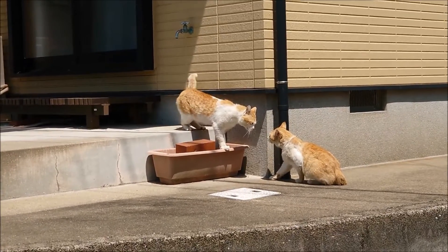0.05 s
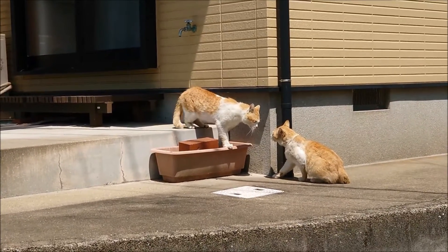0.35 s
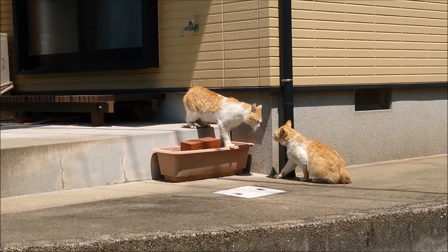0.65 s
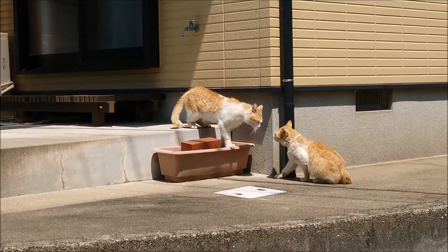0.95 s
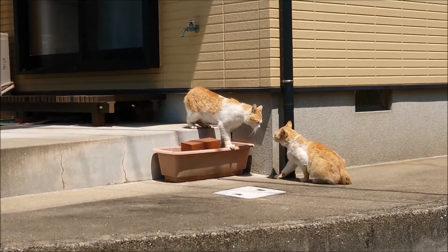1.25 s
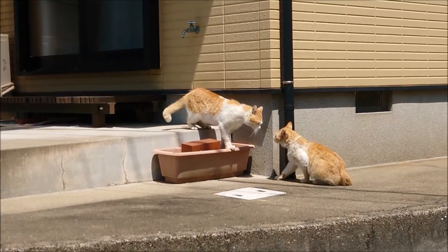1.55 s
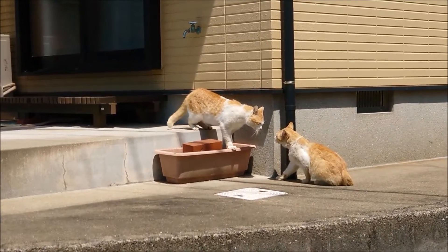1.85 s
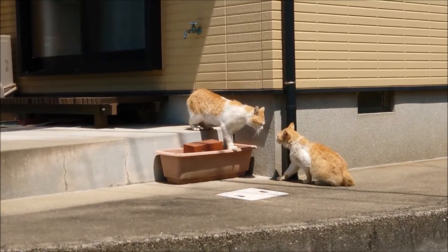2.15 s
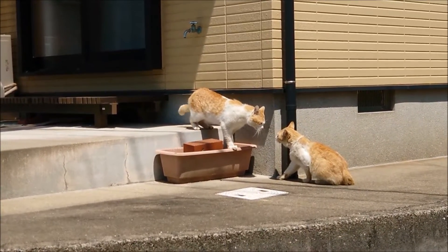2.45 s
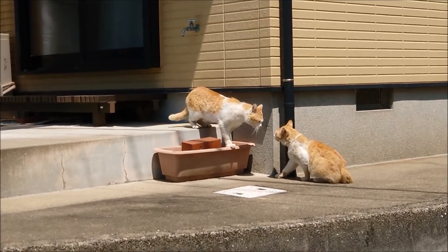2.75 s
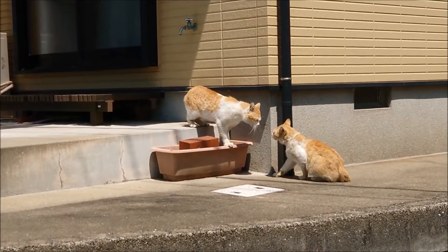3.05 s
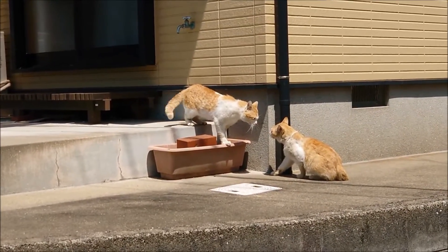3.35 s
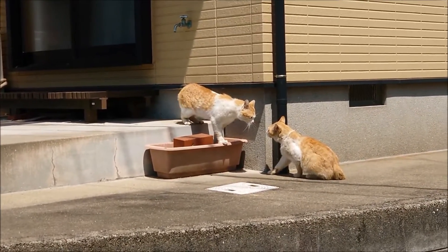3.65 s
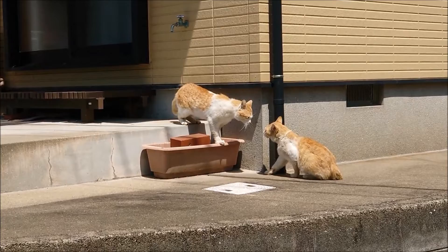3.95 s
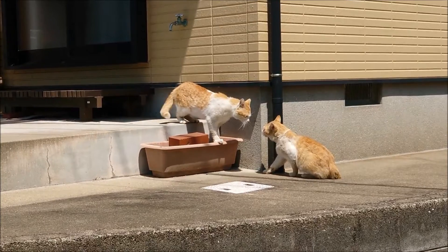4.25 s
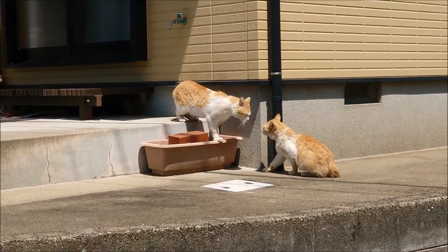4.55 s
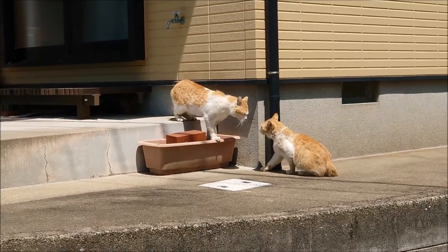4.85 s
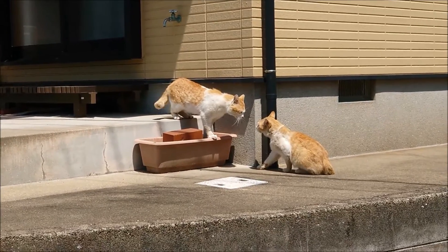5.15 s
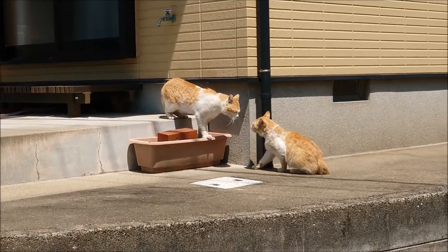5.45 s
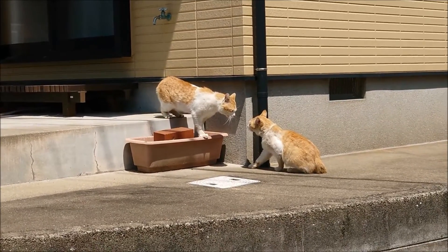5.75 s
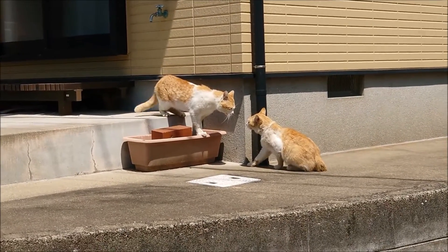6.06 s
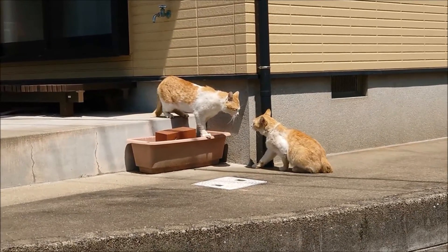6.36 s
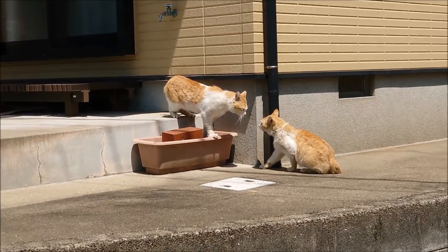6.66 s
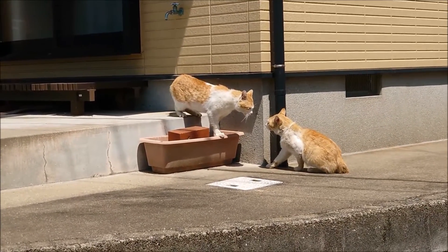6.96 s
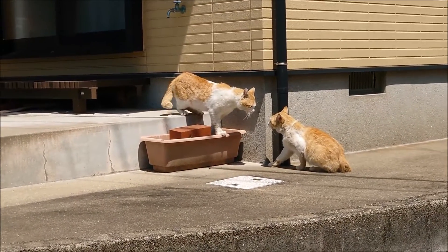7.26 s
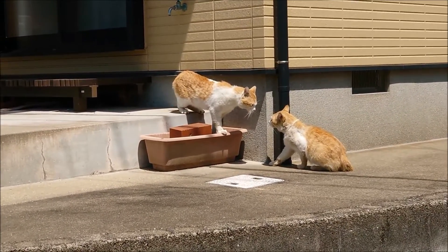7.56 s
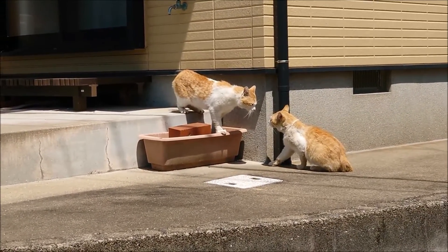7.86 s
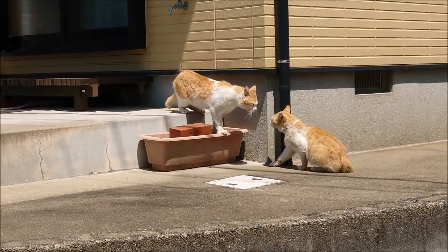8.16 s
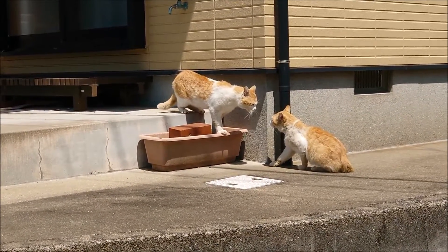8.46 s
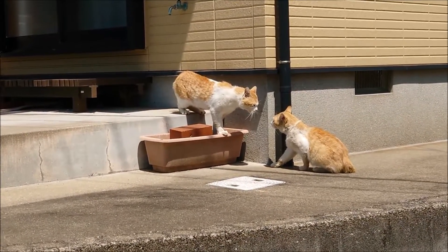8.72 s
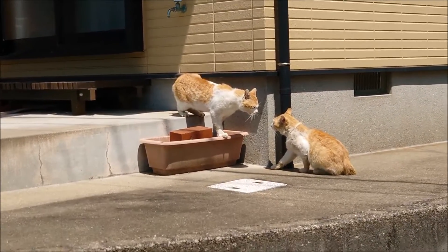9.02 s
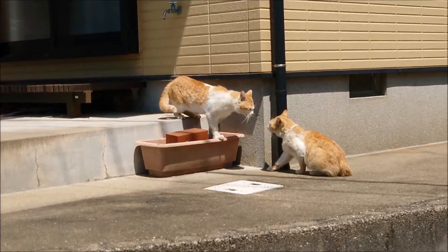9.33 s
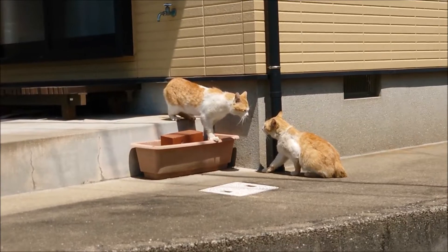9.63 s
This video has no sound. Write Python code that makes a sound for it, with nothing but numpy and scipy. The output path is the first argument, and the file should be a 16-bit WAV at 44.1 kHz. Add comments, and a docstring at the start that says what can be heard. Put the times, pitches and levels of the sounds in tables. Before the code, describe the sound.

Two cats threaten each other beside a house, a few metres from a stereo microphone. The louder is already mid-yowl, a clean, moaning tone that dulls and falls away by 1.3 seconds. It yowls again from about 2 to 4 seconds, brightening as its mouth opens, then sliding down. The rival answers from 4 to 6 seconds with a quieter, closed-mouth moan, overlapped by the third yowl from 4.8 to 6.6. A very faint low moan lingers in the pause, and the rival gives a short falling reply around 8 seconds. The fourth yowl runs from 8.3 to nearly 10 seconds, slightly raspier and climbing before it dips. Small birds chip nearby throughout, with a few tiny dry ticks between 3 and 7.5 seconds. Light wind rumbles on the microphone over faint town noise, and a distant motor hum swells slightly from about 6 seconds.

```python
"""A cat in mid-yowl, a few metres from the microphone on a concrete drive beside a house wall.
It yowls four times, and a rival answers with its mouth nearly shut. Each yowl is a clean harmonic
tone from the vocal folds, a moan that brightens as the jaw opens and dulls as it closes.
Small birds chip nearby and a few dry ticks sound. Far off a motor hums in the town noise,
and light wind rumbles on the two ports of the stereo microphone."""
import sys
import numpy as np
from scipy import signal
from scipy.fft import rfft, irfft
from scipy.io import wavfile
from scipy.ndimage import uniform_filter1d

SR = 44100
rng = np.random.default_rng(int(sys.argv[2]) if len(sys.argv) > 2 else 0)


def inscribe(sig):
    """Save sig as 16-bit PCM at rate SR to the path in sys.argv[1].

    A 1-D sig is mono; a 2-D sig holds one channel per row.
    Samples are clipped to [-1, 1] before scaling.
    """
    pcm = np.round(np.clip(np.atleast_2d(sig).T, -1, 1) * 32767)
    wavfile.write(sys.argv[1], SR, pcm.astype(np.int16))


N = 431738
TIME = np.arange(N) / SR
FREQS = np.fft.rfftfreq(N, 1 / SR)

# the louder cat's four yowls: time_s, pitch_hz, level_db, mouth (0 shut, 1 open)
FIRST_YOWL = [(0.0, 513, -40.2, 0.72), (0.28, 513, -43, 0.55), (0.55, 492, -42.5, 0.32),
              (0.686, 467, -37, 0.17), (1.023, 407.3, -41.5, 0.14), (1.27, 330, -48, 0.27)]
SECOND_YOWL = [(2.1, 452.3, -46.5, 0.32), (2.484, 462.6, -41, 0.41), (2.668, 485.7, -38.5, 0.7),
               (3.109, 496, -40, 0.78), (3.302, 497, -43, 0.61), (3.58, 479, -41.5, 0.3),
               (3.689, 464.6, -39.0, 0.2), (3.858, 409.3, -40.5, 0.0), (4.2, 304, -43, 0.0)]
THIRD_YOWL = [(4.81, 468.7, -52.5, 0.39), (4.948, 473.5, -39.5, 0.51), (5.186, 450, -38.5, 0.67),
              (5.511, 469.5, -39, 0.73), (5.716, 474.6, -38, 0.97), (6.0, 488.7, -39.5, 0.91),
              (6.188, 485, -42.5, 0.66), (6.406, 457.6, -42.5, 0.41), (6.565, 377.5, -48.5, 0.29),
              (6.8, 274, -37, 0.58)]
FOURTH_YOWL = [(8.285, 454.5, -49, 0.31), (8.415, 453.9, -39.5, 0.74), (8.546, 469.2, -40, 0.72),
               (8.68, 457.5, -36, 0.77), (8.913, 476.6, -39, 0.91), (9.146, 500.4, -42, 0.93),
               (9.342, 515.6, -43.5, 0.73), (9.59, 514.2, -43.5, 0.31), (9.683, 486.5, -43.5, 0.27),
               (9.79, 451.3, -37.5, 0.1)]
# what the open mouth does to the partials and to two resonances:
# mouth (0-1), fundamental_db, octave_db, overtones_db, middle_hz, middle_db, high_hz, high_db
MOUTH_VOWELS = [(0, -1.5, -41, -50.5, 4440, 17, 5500, 0), (.35, 0, -3.5, -22, 4250, 6.5, 5660, 5),
                (.6, -2.5, -1.5, -19.5, 3667, 17, 5509, 9), (1, -8.5, 9.5, -12, 3387, 15.5, 6040, 10.5)]
# overtone colour of the throat: frequency_hz, gain_db
THROAT_COLOUR = [(1400, 0), (1900, -7), (2450, -4), (2900, -30.5), (3400, -23.5), (4300, -17.5),
                 (5000, -22.5), (5900, -22), (6800, -30.5), (8200, -58.5), (9300, -32), (10300, -54.5),
                 (12300, -29.5), (15000, -48)]
# catches and surges in the voice, strongest on its octave: peak_s, change_db, rise_fall_s
VOICE_CATCHES = [(3.33, -1, .04), (3.48, 3.5, 0.02), (4.92, 9, .02), (5.0, -1.5, 0.027), (5.5, -3.5, 0.13),
                 (6.41, 1, 0.032), (8.471, -4.5, 0.011), (8.69, -11, 0.039), (8.799, -2.5, 0.013),
                 (9.009, -4.5, 0.049)]
# the rival's two answers: time_s, pitch_hz, fundamental_db, octave_db
LONG_ANSWER = [(4.04, 354, -55, -71), (4.17, 443, -45.5, -63.5), (4.26, 453.7, -44.5, -60.5),
               (4.55, 416.6, -45.5, -48), (4.82, 424, -46.5, -50.5), (5.0, 401, -54, -52),
               (5.58, 365.5, -54.5, -70.5), (5.78, 372.4, -58, -64.5), (6.25, 307.5, -73, -84.5)]
SHORT_ANSWER = [(7.85, 595, -73, -86), (8.1, 460, -55.5, -83), (8.3, 398, -65, -75)]
# a faint low moan in the pause: time_s, pitch_hz, level_db
LOW_MOAN = [(6.6, 318, -62), (6.8, 272, -67.5), (6.92, 298, -74), (7.2, 311, -74), (7.7, 302, -74),
            (8.15, 274, -78)]
# how the voices reach the microphone's ports: frequency_hz, left_minus_right_db, left_lead_rad
MIC_PORTS = [(450, -2.5, 0.17), (960, -7.5, -0.96), (1510, -8.5, 1.4), (2120, 2, -1.8), (2270, -2, -0.71),
             (3500, 0, 0.91), (5800, -41, -0.066), (9000, -17.5, 1), (13000, -1.5, 0.7)]
# nearby birds: peak_s, level_db, rise_fall_s
BIRD_CHIPS = [(0.147, -45.5, .0098), (0.602, -63.5, .014), (1.008, -47.5, 0.01), (1.772, -57, 0.015),
              (1.977, -63, .022), (2.768, -51.5, 0.014), (3.457, -48.5, 0.011), (3.818, -59, 0.013),
              (4.179, -54, 0.011), (4.539, -58.5, 0.034), (4.974, -48.5, 0.017), (5.768, -52, .012),
              (6.661, -46, 0.009), (7.161, -52.5, 0.027), (7.511, -49, 0.015), (7.969, -63, 0.021),
              (8.432, -46, 0.012), (9.42, -46, .017)]
# small dry ticks: start_s, level_db, decay_s, centre_hz, half_width_hz
DRY_TICKS = [(3.308, -54, .005, 1990, 247), (3.601, -60, .001, 13000, 5000),
             (6.306, -58, 0.00093, 13000, 6000), (7.294, -61, 0.0011, 13000, 8000)]
# gusts on the microphone: peak_s, level_db, rise_fall_s, left_minus_right_db
MIC_GUSTS = [(1.4, -47.5, 0.3, -2), (2.7, -48, .2, -12.5), (3.051, -42.5, 0.16, 0), (4.35, -48.5, .05, -21),
             (5.45, -41, .1, -14), (6.25, -45.5, 0.3, 11), (7.45, -45.5, 0.23, -8.5), (7.85, -50, 0.2, -28),
             (8.55, -48.5, 0.52, 2)]
# colour of the wind rumble: frequency_hz, gain_db
WIND_COLOUR = [(15, -3), (30, 4), (50, -7), (80, -7.5), (120, -23.5), (200, -28), (400, -70.5)]
# swells of the far motor's hum: peak_s, level_db, rise_fall_s
MOTOR_SWELLS = [(6.42, -48, 0.15), (7.2, -51, 0.24), (8.6, -47, 0.44)]
# colour of the far town noise: frequency_hz, gain_db
TOWN_COLOUR = [(100, -4), (160, -17), (240, -24), (400, -16), (680, -15.5), (1000, -19), (1600, -25.5),
               (2200, -32), (3000, -37.5), (4200, -35.5), (6300, -39.5), (8200, -59), (12500, -48),
               (15500, -50)]
# its stereo width: frequency_hz, side_minus_mid_db
TOWN_WIDTH = [(100, -23.5), (300, -9), (700, -1.5), (1500, 1), (4000, -1), (12000, 1)]

STRAIN_HZ, STRAIN_DB_PER_HZ = 495.7, 0.1352  # above this pitch power moves from fundamental to octave
GIVE_OUT_HZ, GIVE_OUT_DB_PER_HZ = 369.4, 0.79  # below this pitch the voice dies away
SAG_DULLS_DB_PER_HZ = 0.06  # overtones lost while the pitch scoops up or sags from its peak
UNDERTONE_RATIO, UNDERTONE_DB = .6, -35  # a faint second tone under each yowl


def yowl(table, low_hz, low_db, bright_db, treble_db, ring_db, tongue, scoop_hz=0, scoop_s=1,
         flutter_db=3, patchy_db=3, tremble_db=2, rasp=0.17, treble_follow=0.57, open_db=-56):
    """The folds sound a gliding tone; the opening mouth lifts its overtones and slides resonances."""
    out, on = np.zeros((2, N)), span(table)
    t = TIME[on]
    hz, level_db, mouth = curves(table, t)
    flat_hz = scoop_hz * np.exp((t[0] - t) / scoop_s)
    hz -= flat_hz
    level_db -= GIVE_OUT_DB_PER_HZ * np.maximum(GIVE_OUT_HZ - hz, 0)
    strain_db = STRAIN_DB_PER_HZ * np.maximum(hz - STRAIN_HZ, 0)
    catch_db = sum(db * swell(t - s, seconds) for s, db, seconds in VOICE_CATCHES)
    base_db, octave_db, over_db, *_ = curves(MOUTH_VOWELS, mouth)
    # the tongue shifts the vowel from call to call
    *_, middle_hz, middle_db, high_hz, high_db = curves(MOUTH_VOWELS, mouth + tongue)
    resonances = [(low_db, low_hz), (middle_db + ring_db, middle_hz), (high_db + ring_db, high_hz),
                  (-17 * (1 - mouth), 2450)]  # a closing mouth swallows one band
    phase = unsteady_phase(hz, waver=.0024, jitter=0.0036)
    voice = partial(phase, hz, level_db + base_db - strain_db + .65 * drift(40, len(t)))
    octave_db += level_db + strain_db + catch_db + 1.2 * drift(35, len(t))
    voice += partial(2 * phase, 2 * hz, octave_db)
    under_db = level_db + UNDERTONE_DB + 3 * drift(8, len(t))
    voice += partial(UNDERTONE_RATIO * phase, UNDERTONE_RATIO * hz, under_db)
    sag_db = SAG_DULLS_DB_PER_HZ * (np.maximum.accumulate(hz) - hz + flat_hz)
    over_db += level_db - sag_db + 0.41 * catch_db
    # the folds close unevenly, so all overtones tremble together
    over_db += tremble_db * np.tanh(drift(70, len(t)))
    # the treble also leaves through the nose, so it fades less as the mouth shuts
    nasal_db = open_db + treble_db + treble_follow * (over_db - open_db)
    for k in range(3, 28):
        drive_db = over_db + bright_db if k < 6 else nasal_db + patchy_db * drift(6, len(t))
        vowel_db = sum(db * resonance(k * hz, centre, half_width_hz=220) for db, centre in resonances)
        db = drive_db + colour(THROAT_COLOUR, k * hz) + vowel_db
        db += flutter_db * np.tanh(drift(22, len(t)))
        grit = 1 + rasp * np.log(k / 2) * drift(500, len(t))  # higher overtones vary more per cycle
        voice += grit * partial(k * phase, k * hz, db)
    out[:, on] = voice * fade(t, seconds=.024)
    return out


def answer(table, nasal_db=-35, nasal_hz=4200):
    """The rival yowls through a closed mouth: two strong partials and a thin nasal ring."""
    out, on = np.zeros((2, N)), span(table)
    t = TIME[on]
    hz, base_db, octave_db = curves(table, t)
    phase = unsteady_phase(hz, waver=.003, jitter=0.0011)
    voice = partial(phase, hz, base_db + .4 * drift(21, len(t)))
    voice += partial(2 * phase, 2 * hz, octave_db)
    for k in range(3, 12):
        nose = resonance(k * hz, nasal_hz, half_width_hz=220)
        voice += nose * partial(k * phase, k * hz, base_db + nasal_db)
    out[:, on] = voice * fade(t, seconds=0.033)
    return out


def moan():
    """A faint, nearly pure low moan between the yowls."""
    hz, db = curves(LOW_MOAN, TIME)
    phase = unsteady_phase(hz, waver=0.00496, jitter=0.0016)
    return partial(phase, hz, db) * span(LOW_MOAN)


def birds(centre_hz=4250, rasp_hz=240, slur_s=.022, burst_s=0.012, left_db=-8):
    """Nearby chips: raspy notes that drop in pitch through short bursts, the steepest the harshest."""
    out = np.zeros(N)
    for peak_s, db, rise_fall_s in BIRD_CHIPS:
        on = np.abs(TIME - peak_s) < 4 * rise_fall_s
        t = TIME[on] - peak_s
        fall_hz = 1758 / (1 + (rise_fall_s / slur_s) ** 4)  # longer chips fall less
        hz = centre_hz + (rasp_hz + .1 * fall_hz) * drift(2200, len(t))
        hz -= fall_hz * np.tanh(0.28 * t / rise_fall_s) / 2
        pulses = np.cos(np.pi * t / burst_s + .5 * drift(66, len(t))) ** 4
        bursts = unit((0.79 + pulses) * undb(2 * drift(220, len(t))))
        out[on] += undb(db) * bursts * swell(t, rise_fall_s) * np.sin(2 * np.pi * np.cumsum(hz) / SR)
    return np.array([out * undb(left_db), np.roll(out, 2)])


def ticks():
    """Tiny clicks, each a puff of noise around one resonance."""
    out = np.zeros((2, N))
    for start_s, db, decay_s, hz, half_width_hz in DRY_TICKS:
        on = (TIME >= start_s) & (TIME < start_s + 10 * decay_s)
        size = on.sum()
        band = resonance(np.fft.rfftfreq(size, 1 / SR), hz, half_width_hz)
        ring = irfft(rfft(rng.standard_normal((2, size))) * band, size)
        out[:, on] += undb(db) * np.exp((start_s - TIME[on]) / decay_s) * unit(ring)
    return out


def yard(direct, early_db, tail_db, early_s, tail_t60_s=.45):
    """Adds scattered echoes from drive, step and wall, then a tail from the houses around."""
    t = TIME[:SR // 2]
    early, tail = rng.standard_normal((2, 2, len(t)))
    early *= np.exp(-t / early_s) * (t > .002)
    tail *= undb(-60 * t / tail_t60_s) * (t > .015)
    echoes = sum(undb(db) * part / np.linalg.norm(part, axis=1, keepdims=True)
                 for db, part in [(early_db, early), (tail_db, tail)])
    # small edges scatter treble more than bass
    scattered = signal.sosfilt(signal.butter(1, 1200, "high", fs=SR, output="sos"), direct.mean(axis=0))
    return direct + signal.fftconvolve(scattered[None], echoes, axes=1)[:, :N]


def wind(breeze_db=-55.5, breeze_pan_db=-7.5, flutter_db=2.5, shared=0.9):
    """A light breeze and single gusts buffet the microphone's two ports, partly together."""
    rumble = undb(colour(WIND_COLOUR, FREQS))
    both, left, right = (unit(noise(rumble)) * undb(flutter_db * drift(16, N)) for _ in range(3))
    side = np.array([[.5], [-.5]])
    breeze_power = undb(breeze_db + side * breeze_pan_db) ** 2
    gust_power = sum((undb(db + side * pan_db) * swell(TIME - s, seconds)) ** 2
                     for s, db, seconds, pan_db in MIC_GUSTS)
    return unit(np.array([left, right]) + shared * both) * np.sqrt(breeze_power + gust_power)


def motor(idle_hz=78.2, rev_hz=121.3, work_hz=104, rev_s=5.9, settle_s=6.75, idle_db=-66, rumble=0.37):
    """A distant engine's unsteady hum: it idles, revs up briefly and settles to a working speed."""
    revved, settled = (.5 + .5 * np.tanh((TIME - s) / 0.076) for s in (rev_s, settle_s))
    hz = idle_hz + (rev_hz - idle_hz) * revved + (work_hz - rev_hz) * settled
    swell_power = sum((undb(db) * swell(TIME - s, seconds)) ** 2 for s, db, seconds in MOTOR_SWELLS)
    phase = unsteady_phase(hz, waver=.012, jitter=0.0036)
    hum = (0.88 + rumble * drift(25, N)) * np.sin(phase) + rumble * drift(25, N) * np.cos(phase)
    return hum * np.sqrt(undb(idle_db) ** 2 + swell_power)


def town(level_db=-56.5, low_cut_hz=90, whine_hz=6537, whine_db=-88):
    """Far-off town noise, alike at both ports in the bass, with a thin whine at one pitch."""
    gain = undb(colour(TOWN_COLOUR, FREQS)) * FREQS ** 2 / (FREQS ** 2 + low_cut_hz ** 2)
    mid, side = noise(gain), noise(gain * undb(colour(TOWN_WIDTH, FREQS)))
    bed = unit(np.array([mid + side, mid - side])) * undb(level_db)
    whine = undb(whine_db) * np.sin(2 * np.pi * whine_hz * TIME)
    return bed + whine * (1 + 0.41 * drift(12, N))


def unsteady_phase(hz, waver, jitter):
    """Phase of a vibration with a slow waver and a fine jitter on its pitch."""
    wobble = 1 + waver * drift(35, len(hz)) + jitter * drift(450, len(hz))
    return 2 * np.pi * np.cumsum(uniform_filter1d(hz, size=900) * wobble) / SR


def partial(phase, hz, db):
    """One partial of a voice as both ports hear it; db is their mean level."""
    side = np.array([[.5], [-.5]])
    gain = undb(side * colour(MIC_PORTS, hz))
    lead_rad = side * colour(MIC_PORTS, hz, column=2)
    return np.sqrt(2) * undb(db) * gain / gain.mean(axis=0) * np.sin(phase + lead_rad)


def resonance(hz, centre_hz, half_width_hz):
    """Bell-shaped rise, 1 at the centre."""
    return 1 / (1 + ((hz - centre_hz) / half_width_hz) ** 2)


def swell(t, seconds):
    """Smooth rise and fall, 1 at time zero."""
    return 1 / np.cosh(np.clip(t / seconds, -20, 20))


def fade(t, seconds):
    """Soft start and end of a call, except at the edges of the scene."""
    since_start = t - t[0] + seconds * (t[0] == 0)
    until_end = t[-1] - t + seconds * (t[-1] == TIME[-1])
    return np.clip(np.minimum(since_start, until_end) / seconds, 0, 1)


def span(table):
    """Samples covered by a table."""
    return (TIME >= table[0][0]) & (TIME <= table[-1][0])


def curves(table, at):
    """The columns of a table, joined by straight lines along its first column."""
    knots, *columns = np.transpose(table)
    return [np.interp(at, knots, column) for column in columns]


def colour(table, hz, column=1):
    """One column of a spectrum, read on a log-frequency axis."""
    rows = np.array(table)
    return np.interp(np.log(hz + 1), np.log(rows[:, 0]), rows[:, column])


def noise(gain):
    """Noise with the given gain per frequency."""
    return irfft(rfft(rng.standard_normal(N)) * gain, N)


def drift(rate_hz, size):
    """Smooth random drift of rms 1."""
    hold = max(int(SR / rate_hz), 2)
    steps = np.repeat(rng.standard_normal(size // hold + 1), hold)
    return unit(uniform_filter1d(uniform_filter1d(steps, hold), hold)[:size])


def undb(db):
    """Decibels to gain."""
    return 10 ** (np.asarray(db) / 20)


def unit(x):
    """Scale to rms 1."""
    return x / np.sqrt(np.mean(x ** 2))


def scene():
    """Both cats and the birds in the yard, over the outdoor background."""
    louder = yowl(FIRST_YOWL, low_hz=1380, low_db=9, bright_db=1, treble_db=4, ring_db=-3.5,
                  tongue=0.052)
    louder += yowl(SECOND_YOWL, low_hz=1680, low_db=6.5, bright_db=0, treble_db=-2, ring_db=3,
                   tongue=0.15, scoop_hz=115.2, scoop_s=.038)
    louder += yowl(THIRD_YOWL, low_hz=1840, low_db=12, bright_db=-3, treble_db=-1, ring_db=1,
                   tongue=-.03, scoop_hz=84.4, scoop_s=.075)
    louder += yowl(FOURTH_YOWL, low_hz=1810, low_db=8, bright_db=0.5, treble_db=1.5, ring_db=-1,
                   tongue=0.024, scoop_hz=121, scoop_s=0.031, rasp=0.22)
    rival = answer(LONG_ANSWER) + answer(SHORT_ANSWER) + moan()
    cats = yard(louder + rival, early_db=-10, tail_db=-20, early_s=0.058)
    chips = yard(birds(), early_db=-5, tail_db=-5.5, early_s=0.01)
    return cats + chips + ticks() + wind() + motor() + town()


def record(dry):
    """The recorder cuts rumble below 16 Hz and treble above 15.3 kHz."""
    low_cut = signal.butter(2, 16, "high", fs=SR, output="sos")
    high_cut = signal.ellip(12, .2, 80, 15300, fs=SR, output="sos")
    return signal.sosfilt(high_cut, signal.sosfilt(low_cut, dry))


dry = scene()
out = record(dry)
inscribe(out)
```